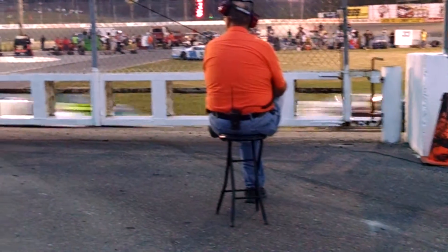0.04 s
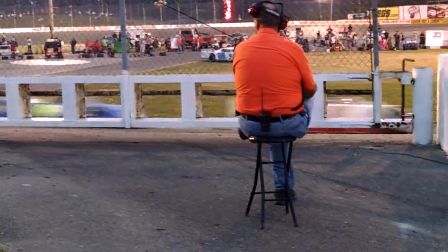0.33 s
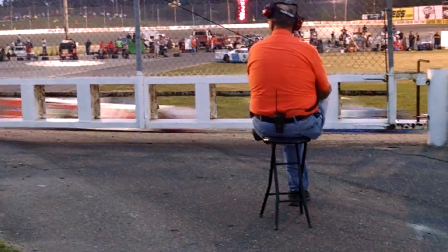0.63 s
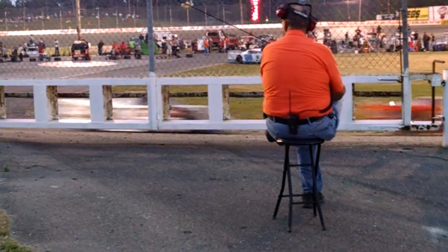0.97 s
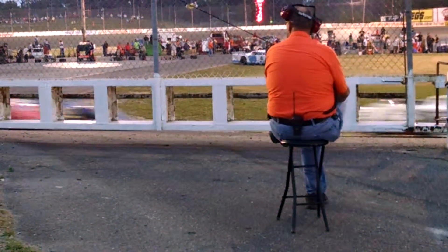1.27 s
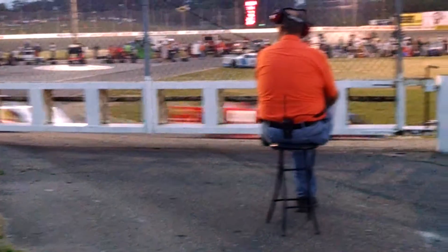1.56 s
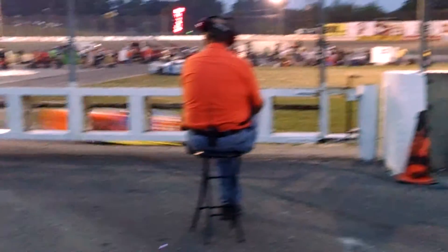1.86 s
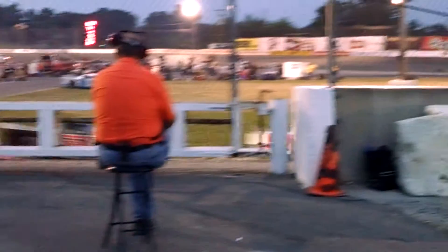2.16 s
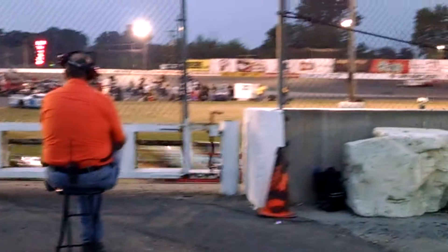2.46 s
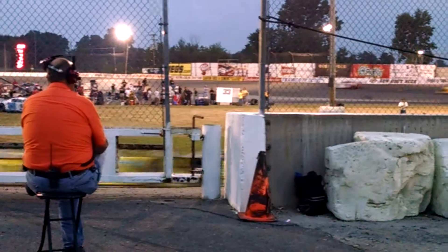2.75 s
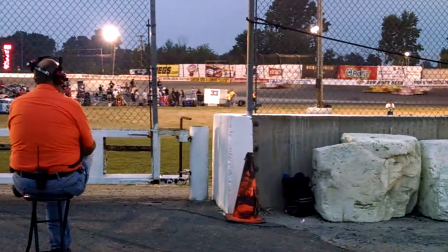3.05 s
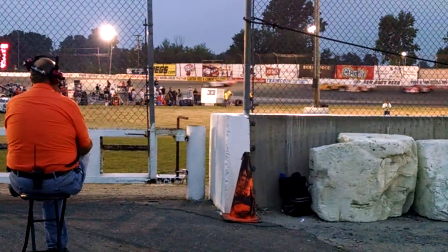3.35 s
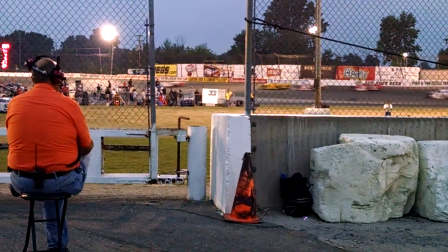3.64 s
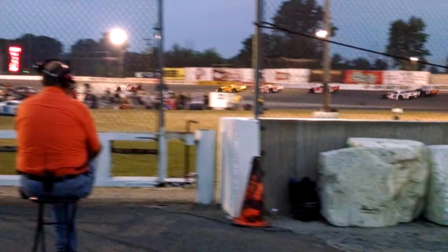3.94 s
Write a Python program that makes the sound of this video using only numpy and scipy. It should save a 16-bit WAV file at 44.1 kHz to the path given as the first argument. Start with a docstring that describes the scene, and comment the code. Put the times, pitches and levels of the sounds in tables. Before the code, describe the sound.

Loud race car engines howl by in a pack over the roar of a track.

```python
"""At a racetrack fence, a pack of V8 stock cars streams past and lifts off for the turn, falling in pitch;
the last cars are back on the throttle. Each near exhaust radiates harmonics of its engine cycle,
Doppler-shifted as it swells and fades, with a rush of hiss and a rasp once per cycle. Behind them the
rest of the field superposes into one roar. Two microphone ports hear it at the edge of overload."""
import sys
import numpy as np
from scipy.fft import rfft, irfft, next_fast_len
from scipy.io import wavfile
from scipy.ndimage import uniform_filter1d, map_coordinates

SR = 44100
rng = np.random.default_rng(int(sys.argv[2]) if len(sys.argv) > 2 else 0)


def generate_wav(signal):
    """Clip the signal to [-1, 1] and save it as 16-bit WAV at the path in sys.argv[1]."""
    frames = np.transpose(np.atleast_2d(signal))
    scaled = np.clip(frames, -1, 1) * 32767
    pcm = np.round(scaled).astype(np.int16)
    wavfile.write(sys.argv[1], SR, pcm)


N = 176400

# The distant roar. Each row: time in seconds, then bass, middle and upper relative levels in dB.
ROAR_LEVELS = [(0, -17.5, -13, -22.5), (.9, -15, -13, -19.5), (1.3, -18, -15, -21.5),
               (1.8, -16.5, -16, -16.5), (2.6, -15, -14, -21.5), (3.2, -20, -16.5, -22.5),
               (3.55, -19.5, -18, -20.5), (3.85, -22.5, -14.5, -16.5)]
# Direction of the roar's bass. Each row: time in seconds, left minus right in dB.
ROAR_PAN = [(0, -1.5), (1.2, -4), (2.7, -1), (3.2, -5.5), (4, -11.5)]
# A low thrum, and the drone of cars in the turn. Each row: time in seconds, level in dB.
THRUM_LEVELS = [(0, -31), (.1, -28), (.25, -46), (.65, -46), (.9, -29), (1.45, -28), (1.7, -42), (2.8, -46)]
DRONE_LEVELS = [(2.9, -44), (3.3, -35), (3.65, -31.5)]
# Spectra of the roar's bands and of the rush. Each row: frequency in Hz, relative level in dB.
BASS_SPECTRUM = [(25, -38), (38, -19.5), (92, -16), (128, -11.5), (170, -8.5), (240, 1.5), (380, -8),
                 (800, -58)]
MIDDLE_SPECTRUM = [(260, -66), (440, -7.5), (610, 0), (760, -6.5), (900, -15), (1500, -57)]
UPPER_SPECTRUM = [(600, -21), (900, -2), (1250, -1), (1550, -9.5), (1950, -9.5), (2500, -22.5), (4000, -46)]
THRUM_SPECTRUM = [(105, -28), (135, 0.5), (175, 0.5), (215, -37.5)]
DRONE_SPECTRUM = [(92, -11), (116, 8), (132, -9), (190, -65)]
HISS_SPECTRUM = [(1200, -55), (2600, 3), (3650, -1.5), (5000, -.5), (11000, 2), (15000, 0.5)]
RASP_SPECTRUM = [(1200, -4), (2000, 8), (2750, 1), (3600, 6.5), (4800, -1), (6300, 3.5), (15000, -20)]
# Likeness of left and right in roar and rush. Each row: frequency in Hz, correlation coefficient.
CORRELATION = [(90, 0.5), (250, 0.64), (1300, 0.97), (1900, 0.42), (2650, 1), (3150, 0.58), (3650, 1),
               (4400, 0.58), (8500, 0.47), (14000, 0.92)]
# Rushes of passing cars. Each row: peak time in seconds, width in seconds, hiss in dB, rasp in dB.
RUSH_SWELLS = [(.18, .07, -29, -34), (.54, .05, -25, -45), (.67, .06, -25, -32), (.89, .1, -20, -19.5),
               (1.03, .03, -24, -28), (1.15, .06, -22, -25), (1.71, .06, -23.5, -34), (1.86, .06, -21, -28),
               (2.02, .05, -26, -24), (2.2, .07, -22, -27), (2.46, .09, -24.5, -36),
               (2.62, .06, -19.5, -25), (2.8, .07, -25, -34), (3, .06, -27, -45), (3.82, .25, -39, -26.5)]
# Spectral envelope common to the near exhausts. Each row: frequency in Hz, harmonic level in dB.
EXHAUST_SPECTRUM = [(100, -50), (150, -40), (240, -33), (400, -37), (580, -31), (800, -36), (1200, -37),
                    (2600, -54)]
# Near cars. Each row: passing time in seconds, cycle rate then in Hz, fractional slowing per second
# (negative on the throttle), fractional Doppler swing, half-length of the pass in seconds.
NEAR_CARS = [(.2, 58.4, .24, .022, .12), (.35, 49, .16, .01, .22), (1.02, 46.2, .12, .012, .25),
             (1.03, 42.8, .14, .012, .14), (1.68, 47.7, .1, .062, .25), (1.97, 53.05, .127, .031, .22),
             (2.1, 48, .17, .025, .15), (2.38, 46.5, .15, .025, .22), (2.8, 46.35, .16, .015, .2),
             (3.02, 45.95, .19, .025, .1), (3.85, 46.6, -.14, 0, .2)]
# Howling harmonics, one list per near car. Each row: multiple of the cycle rate, peak time in seconds,
# width in seconds, level in dB.
EXHAUST_HOWLS = [
    [(13, .2, .14, -17.5), (5, .23, .12, -20)],
    [(13, .38, .28, -21.5), (10, .24, .12, -21)],
    [(13, 1.02, .12, -15.5), (26, .85, .18, -27)],
    [(13, 1.04, .1, -14.5), (8, .98, .2, -23), (5, 1.27, .2, -25)],
    [(5, 1.62, .27, -18), (11, 1.7, .12, -17.5), (13, 1.78, .11, -16.5), (13, 1.47, .14, -24),
     (24, 1.7, .33, -22.5)],
    [(6, 1.97, .29, -18), (24, 1.9, .25, -28)],
    [(3, 2.2, .36, -23), (5, 2.1, .16, -21)],
    [(11, 2.33, .18, -19.5), (13, 2.52, .15, -19.5), (24, 2.48, .12, -27)],
    [(13, 2.82, .22, -16.5), (13, 2.4, .1, -22), (5, 2.77, .25, -20)],
    [(6, 3.08, .24, -19.5), (6, 2.6, .17, -22.5)],
    [(24, 3.8, .2, -26), (14, 3.85, .18, -24)],
]


def amp(db):
    """Amplitude ratio of a level in decibels."""
    return 10 ** (np.asarray(db) / 20)


def unit_rms(x):
    """Normalisation to unit mean power."""
    return x / np.sqrt(np.mean(x ** 2) + 1e-20)


def at_frequency(points, hz):
    """Interpolation on a logarithmic frequency axis."""
    frequencies, values = np.transpose(points)
    return np.interp(np.log(hz + 1), np.log(frequencies + 1), values)


def curves(rows):
    """Linear interpolation in time, one curve for each column after the first."""
    times, *columns = np.transpose(rows)
    return [np.interp(np.arange(N) / SR, times, column) for column in columns]


def wobble(rate):
    """Smooth random modulation: a spline through `rate` Gaussian knots a second."""
    times = np.linspace(0, N / SR, 1000)
    spline = map_coordinates(rng.standard_normal(400), [times * rate], mode='wrap')
    return np.interp(np.arange(N) / SR, times, spline)


def filtered(x, response):
    """Linear filtering: the spectrum is multiplied by a frequency response."""
    size = next_fast_len(N + SR // 8)
    return irfft(rfft(x, size) * response(np.fft.rfftfreq(size, 1 / SR)), size)[..., :N]


def spread(pair, spectrum):
    """Partial coherence: two independent signals are coloured and mixed to stereo at unit rms."""
    def response(hz):
        angle = np.arccos(np.clip(at_frequency(CORRELATION, hz), -1, 1)) / 2
        return amp(at_frequency(spectrum, hz)) * [np.cos(angle), np.sin(angle)]
    mid, side = filtered(pair, response)
    return unit_rms(np.array([mid + side, mid - side]))


def pan(db):
    """Direction by level difference: two gains, the left `db` above the right."""
    return np.array([amp(db / 2), amp(-db / 2)]).reshape(2, -1)


def harmonics(cycles, gains, size=4096):
    """Fourier synthesis: a periodic wave with rms gains[k] at harmonic k, in random phases."""
    period = irfft(gains * np.exp(2j * np.pi * rng.random(len(gains))), size) * size / np.sqrt(2)
    return np.interp(cycles % 1 * size, np.arange(size + 1), np.append(period, period[0]))


def distant_engines(count=13, glide_per_s=.22, throttle_s=3.6, half_length_s=.3, turbulence_db=2):
    """Superposition: many gliding engine notes swell and fade in turbulent noise."""
    t, engines = np.arange(N) / SR, np.zeros(N)
    for when in np.linspace(0, N / SR, count):
        glide = glide_per_s * np.sign(when - throttle_s)  # early cars slow, late ones speed up
        hz = rng.uniform(41, 55) * np.exp(glide * (t - when) + .00402 * wobble(12))
        gains = rng.rayleigh(size=70) * (np.arange(70) > 2)
        engines += harmonics(np.cumsum(hz) / SR, gains) / (1 + ((t - when) / half_length_s) ** 2)
    return unit_rms(engines) + amp(turbulence_db) * rng.standard_normal(N)


def field_roar(bass_trim_db=-.5, middle_trim_db=-2, upper_trim_db=-2.5):
    """Incoherent sources blend into a roar, whose bass moves right as the cars gather in the turn."""
    engines = np.array([distant_engines(), distant_engines()])
    bass_db, middle_db, upper_db = curves(ROAR_LEVELS)
    bass = amp(bass_db + bass_trim_db) * spread(engines, BASS_SPECTRUM)
    middle = amp(middle_db + middle_trim_db) * spread(engines, MIDDLE_SPECTRUM)
    upper = amp(upper_db + upper_trim_db) * spread(engines, UPPER_SPECTRUM)
    drone = amp(curves(DRONE_LEVELS)[0]) * spread(engines, DRONE_SPECTRUM)
    thrum = amp(curves(THRUM_LEVELS)[0]) * spread(engines, THRUM_SPECTRUM)
    return (bass + drone + thrum) * pan(curves(ROAR_PAN)[0]) + middle + upper


def passing_rush(burst_power, burst_share=.16, hiss_floor_db=-30.5, rasp_floor_db=-33, flutter_db=2.2):
    """Amplitude modulation: engine cycles chop the hiss and darker exhaust rasp of passing cars."""
    t = np.arange(N) / SR
    hiss_power, rasp_power = amp(hiss_floor_db) ** 2, amp(rasp_floor_db) ** 2
    for when, width, hiss_db, rasp_db in RUSH_SWELLS:
        swell = (1 + ((t - when) / width) ** 2) ** -1.7
        hiss_power += swell * amp(hiss_db) ** 2
        rasp_power += swell * amp(rasp_db) ** 2
    mean_power = np.abs(uniform_filter1d(burst_power, size=SR // 8)) + 1e-9
    chop = np.sqrt(1 - burst_share + burst_share * burst_power / mean_power)

    def noise(power, spectrum):
        envelope = np.sqrt(power) * amp(flutter_db * wobble(35))
        return envelope * spread(chop * rng.standard_normal((2, N)), spectrum)
    return noise(hiss_power, HISS_SPECTRUM) + noise(rasp_power, RASP_SPECTRUM)


def exhaust_howl(cycles, order, when, width, db, flutter_db=.7):
    """A single harmonic, phase-locked to the engine cycle, swells out of the exhaust note."""
    t = np.arange(N) / SR
    swell = (1 + ((t - when) / width) ** 2) ** -1.5
    rms = swell * amp(db + flutter_db * wobble(13))
    pan_db = -1.4 * (5 / order) ** 2  # lower harmonics lie further right
    return pan(pan_db) * rms * np.sqrt(2) * np.sin(2 * np.pi * order * cycles)


def exhaust_bursts(cycles, hz, decay_s=.00086, scatter_db=8):
    """Exponential decay: the envelope of one burst of uneven strength per engine cycle."""
    age_s = (cycles % 1) / hz
    return np.exp(-age_s / decay_s) * amp(scatter_db * np.tanh(wobble(45)))


def near_car(when, cycle_hz, slowing, doppler, half_length, howls,
             doppler_s=.25, scatter_db=2, flutter_db=2, leaving_pan_db=-4.5):
    """Periodic firing, Doppler-shifted in passing. Returns the stereo note and the power of its bursts."""
    elapsed = np.arange(N) / SR - when
    recession = elapsed / np.hypot(elapsed, doppler_s)  # -1 approaching, +1 receding
    speed_drift = .0015 * wobble(14)
    hz = cycle_hz * np.exp(-slowing * elapsed - doppler * recession + speed_drift)
    cycles = np.cumsum(hz) / SR + rng.random() + .003 * wobble(70)  # uneven firing
    nearness = (1 + (elapsed / half_length) ** 2) ** -.94
    orders = np.arange(56)
    levels_db = at_frequency(EXHAUST_SPECTRUM, orders * cycle_hz)
    gains = amp(levels_db + scatter_db * rng.standard_normal(len(orders))) * (orders > 2)
    gains[[order for order, *_ in howls]] = 0  # the howls supply these harmonics
    note = nearness * amp(flutter_db * wobble(16)) * harmonics(cycles, gains)
    note = note + sum(exhaust_howl(cycles, *howl) for howl in howls)
    left_to_right = pan(leaving_pan_db * np.tanh(elapsed / half_length))
    return note * left_to_right, (exhaust_bursts(cycles, hz) * nearness) ** 2


def scene():
    """Sound pressures add: the distant roar, the rush of passing and the near exhaust notes."""
    cars = [near_car(*car, howls) for car, howls in zip(NEAR_CARS, EXHAUST_HOWLS)]
    notes, burst_powers = zip(*cars)
    return field_roar() + passing_rush(sum(burst_powers)) + sum(notes)


def record(dry):
    """Phase lag and saturation: the left port lags in the treble, peaks flatten, the band is limited."""
    lag_from_hz, full_turn_hz, ceiling, top_hz = 1340, 2545, 2.1, 15560

    def ports(hz):
        lag = 2 * np.pi * np.maximum(hz - lag_from_hz, 0) / full_turn_hz
        return np.exp(.5j * np.array([-lag, lag]))
    pressure = filtered(dry, ports)
    saturated = pressure / (1 + np.abs(pressure / ceiling) ** 8) ** (1 / 8)
    return filtered(saturated, lambda hz: hz < top_hz)


dry = scene()
out = record(dry)
generate_wav(out)
```